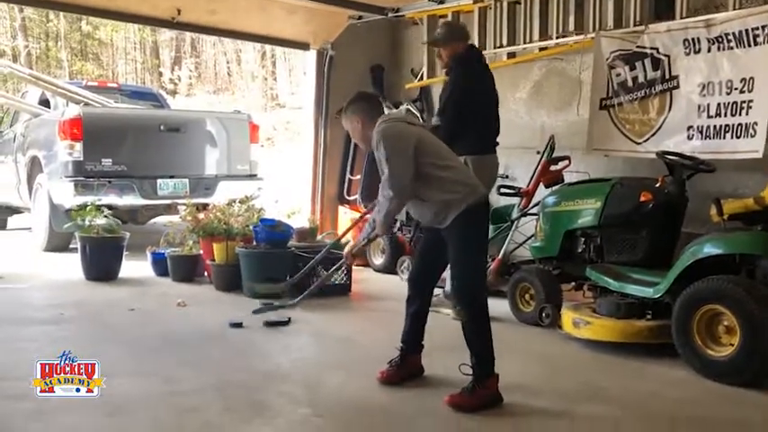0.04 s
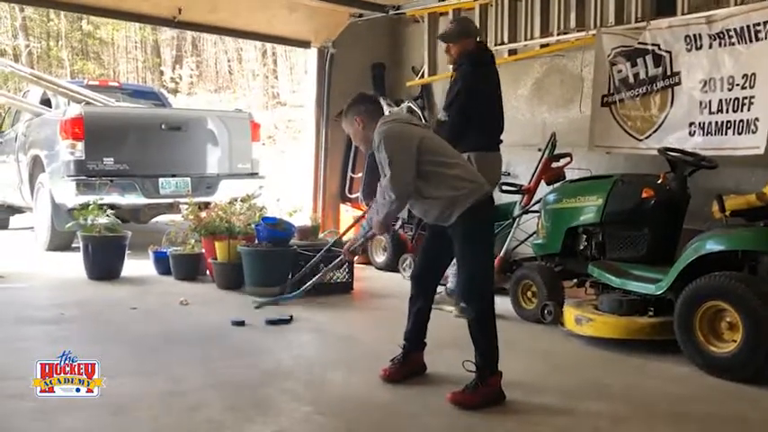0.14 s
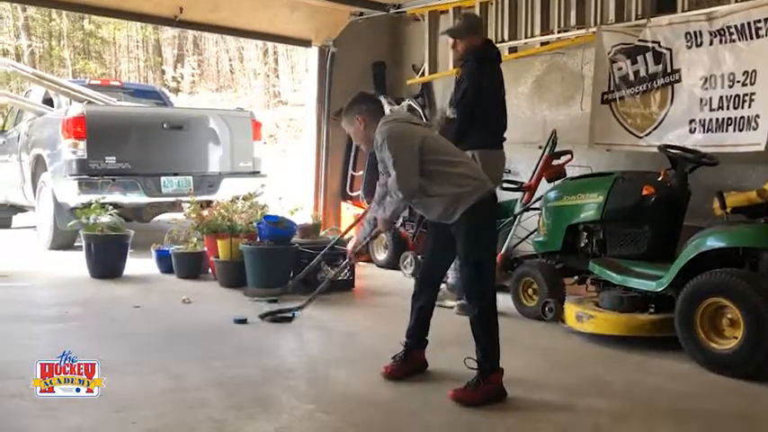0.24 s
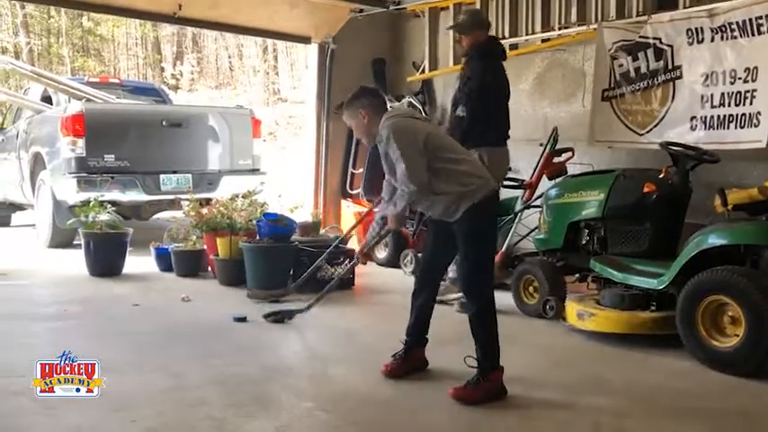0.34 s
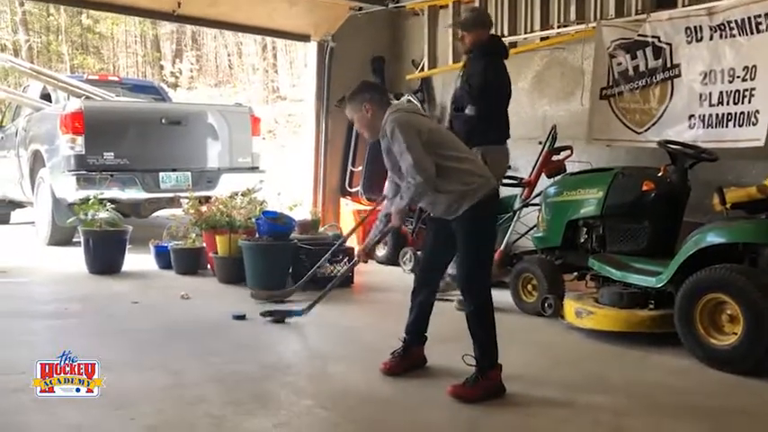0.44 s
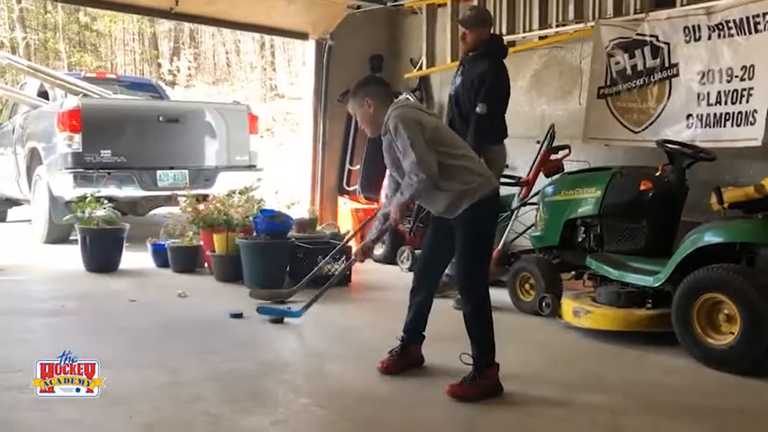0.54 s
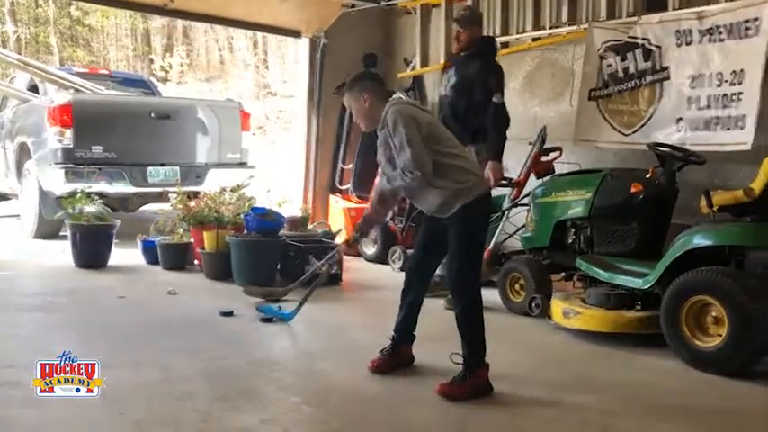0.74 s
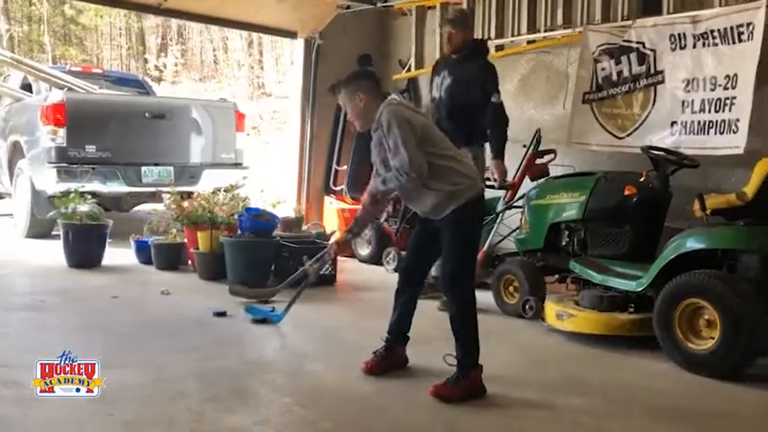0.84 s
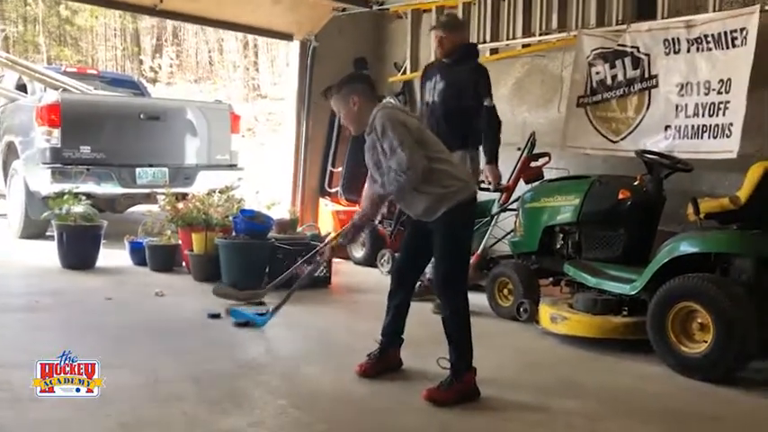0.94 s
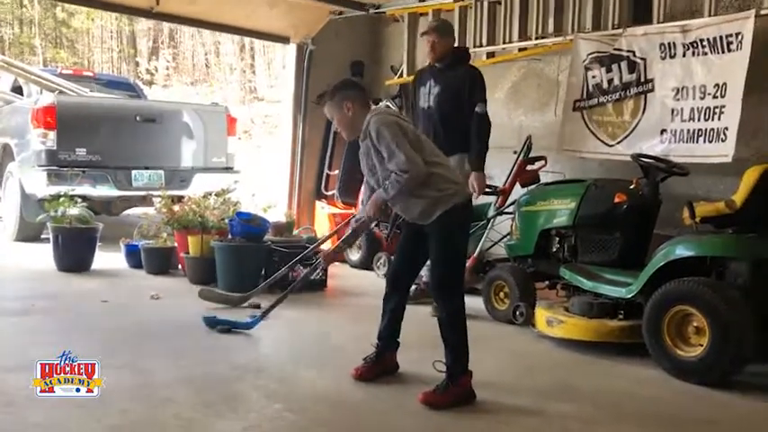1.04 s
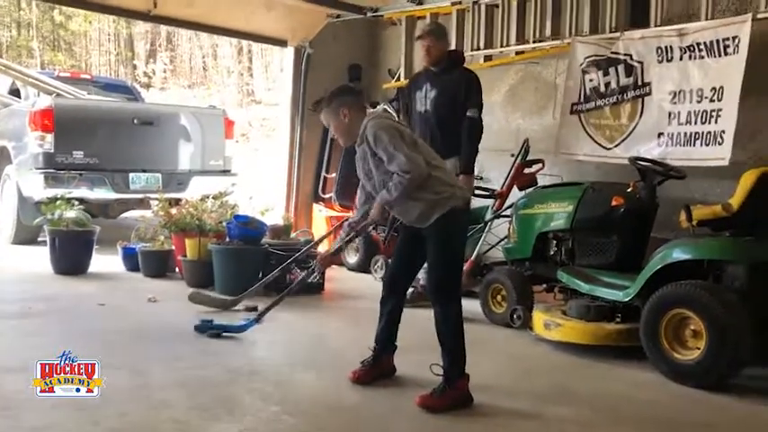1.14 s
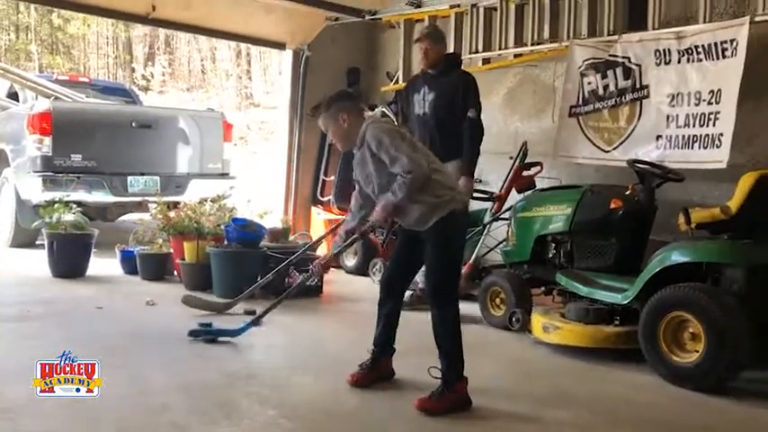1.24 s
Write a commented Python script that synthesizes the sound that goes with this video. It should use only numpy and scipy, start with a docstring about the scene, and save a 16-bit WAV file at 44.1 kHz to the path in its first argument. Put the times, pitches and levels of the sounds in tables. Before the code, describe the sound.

Hockey stick hits on pucks ring briefly off hard garage walls, a few steps from the microphone. First comes a cracking shot and a dull landing, then gritty sliding on concrete, a second sharp clack, and softer taps and scuffs.

```python
"""Garage with a concrete floor, hockey practice. A stick slaps a puck away and it lands with a dull thud;
blades then clack and tap on pucks and scrape over the floor to gather the next one. Each blow is a push,
a noisy crack and ringing modes; scraping is a stream of tiny catches on the concrete's grains.
The hard walls ring after every blow. Faint outdoor noise comes through the open door."""
import sys
import numpy as np
from scipy import signal
from scipy.fft import rfft, irfft, next_fast_len
from scipy.io import wavfile

SR = 44100
rng = np.random.default_rng(int(sys.argv[2]) if len(sys.argv) > 2 else 0)


def waveform_to_disk(signal):
    """Save audio, clipped to [-1, 1], as 16-bit WAV at the path in sys.argv[1]."""
    frames = np.transpose(np.atleast_2d(signal))
    scaled = np.clip(frames, -1, 1) * 32767
    samples = np.round(scaled).astype(np.int16)
    wavfile.write(sys.argv[1], SR, samples)


N = 57330


def amp(db):
    """Decibels to gain."""
    return 10 ** (np.asarray(db) / 20)


def unit(x):
    """Scale to rms 1."""
    return x / np.sqrt(np.mean(x ** 2) + 1e-20)


def burst(x):
    """Scale to the energy of 10 ms at rms 1."""
    return x * np.sqrt(SR / 100 / (np.sum(x ** 2) + 1e-20))


def along(points, hz):
    """Interpolate (frequency [Hz], value) points on a log axis."""
    points_hz, values = np.transpose(points)
    return np.interp(np.log(hz + 1), np.log(points_hz + 1), values)


def colour(x, gain):
    """Minimum-phase filter with magnitude gain(hz)."""
    size = 2 * next_fast_len(len(x))
    magnitude = np.maximum(gain(np.fft.rfftfreq(size, 1 / SR)), 1e-6)
    cepstrum = irfft(np.log(magnitude), size)
    cepstrum[1:size // 2] *= 2
    cepstrum[size // 2 + 1:] = 0
    return irfft(rfft(x, size) * np.exp(rfft(cepstrum)), size)[:len(x)]


def shaped(x, spectrum):
    """Filter by (frequency [Hz], gain [dB]) points."""
    return colour(x, lambda hz: amp(along(spectrum, hz)))


def garage(x):
    """Wall echoes stand out of a tail that swells briefly and dies, treble first."""
    # reverberation (frequency [Hz], t60 [s])
    decay = [(80, 1.6), (180, 0.33), (350, 0.75), (800, 0.76), (2000, 0.6), (4000, 0.49), (7000, 0.38),
             (12000, 0.28), (16000, 0.23)]
    # wall reflections (delay [s], gain [dB])
    echoes = [(.0105, -33), (0.026, -12.5), (.041, -10.5)]
    wall_delay_s, bloom_s = 0.0042, 0.0058
    hz, t, noise = signal.stft(rng.standard_normal(SR), SR, nperseg=256)
    t60_s = along(decay, hz)[:, None]
    tail = signal.istft(noise * amp(-60 * t / t60_s) / np.sqrt(t60_s), SR, nperseg=256)[1]
    age_s = np.maximum(np.arange(len(tail)) / SR - wall_delay_s, 0)
    tail *= 1 - np.exp(-age_s / bloom_s)
    tail /= np.linalg.norm(tail)
    for delay_s, db in echoes:
        tail[round(delay_s * SR)] += amp(db)
    return signal.fftconvolve(x, tail)[:len(x)]


def add(out, start_s, x):
    """Mix x in from start_s."""
    i = round(start_s * SR)
    x = x[max(-i, 0):][:N - max(i, 0)]
    out[max(i, 0):][:len(x)] += x


def blows(hits, modes, crack, room, ring_db, crack_db, push_db, crack_t60_s, low_hz):
    """Each contact gives a push, a noisy crack and ringing modes; little radiates below low_hz."""
    out, t = np.zeros(N), np.arange(SR) / SR
    for start_s, db, cutoff_hz in hits:
        ring = np.zeros(SR)
        for k, (mode_hz, mode_db, t60_s) in enumerate(modes):
            envelope = amp(mode_db + rng.normal(0, 1) - 60 * t / t60_s)
            ring += (-1) ** k * envelope * np.sin(2 * np.pi * mode_hz * t)
        noise = burst(shaped(rng.standard_normal(SR) * amp(-60 * t / crack_t60_s), crack))
        push = burst(shaped(signal.unit_impulse(SR), crack))
        hit = amp(ring_db) * burst(ring) + amp(crack_db) * noise + amp(push_db) * push
        hit = colour(hit, lambda hz: 1 / np.hypot(1, hz / cutoff_hz)
                     / np.hypot(1, (low_hz / (hz + 1)) ** 2))
        hit = amp(db) * burst(hit)
        add(out, start_s, hit + garage(shaped(hit, room)))
    return out


def grit(grains_per_s=2500, spread_db=2.5):
    """Tiny random catches on the grains of the concrete."""
    catches = (rng.random(N) < grains_per_s / SR) * rng.standard_normal(N)
    return catches * amp(spread_db * np.minimum(rng.exponential(size=N), 3))


def clacks():
    """The blade knocks on a puck and rings freely."""
    # knocks (time [s], level [dB], cutoff [Hz])
    hits = [(-.1, -22, 4300), (.6486, -26.5, 7900), (.6496, -15.5, 3030)]
    # free blade (frequency [Hz], level [dB], t60 [s])
    modes = [(694, -14, 0.037), (1352, -4.5, 0.055), (1427, 4, 0.046), (1640, -3, 0.051),
             (2121, -6.5, 0.047), (2650, -7, 0.017), (3400, -24, .018), (4330, -6.5, 0.072),
             (5210, -18, 0.027)]
    # contact spectrum (frequency [Hz], gain [dB])
    crack = [(60, -21), (250, -7.5), (700, -14), (950, -10), (1400, 4.5), (3400, 1), (5200, -7),
             (7000, -16), (16000, -20)]
    # room over direct (frequency [Hz], gain [dB])
    room = [(100, 4), (350, -2.5), (670, 7), (950, 2), (1400, -10), (2200, -1), (3300, -6), (4400, -4.5),
            (12000, -1.5)]
    return blows(hits, modes, crack, room,
                 ring_db=-1.5, crack_db=-2.5, push_db=-3.5, crack_t60_s=0.022, low_hz=446)


def air(level_db=-60.5):
    """Faint outdoor noise through the open door."""
    # background (frequency [Hz], gain [dB])
    spectrum = [(20, -30), (45, -9), (80, -2), (110, -3.5), (250, 5), (600, -4), (2000, -38), (6000, -36),
                (16000, -46)]
    return amp(level_db) * unit(shaped(rng.standard_normal(N), spectrum))


def sliding(trim_db=-1):
    """Blade and puck slide over concrete: a gritty hiss over a low rub."""
    # slide before trim (time [s], hiss [dB], rub [dB])
    levels = [(.2, -64.5, -100), (.34, -46, -73), (.39, -37.5, -52), (.435, -40, -55), (.46, -39.5, -47),
              (.51, -42.5, -44), (.55, -46, -38.5), (.62, -67, -45), (0.661, -81, -47.5), (.79, -60, -70),
              (0.851, -59, -41), (.9, -46.5, -48), (1.0, -56, -54.5), (1.08, -50.5, -74),
              (1.135, -41.5, -59), (1.18, -56, -66), (1.215, -45.5, -56), (1.3, -67, -52.5)]
    # gritty hiss (frequency [Hz], gain [dB])
    hiss_spectrum = [(300, -30.5), (1500, 9), (4000, 3.5), (6500, -2.5), (9000, -8), (13000, -7.5),
                     (16000, -12)]
    # low rub (frequency [Hz], gain [dB])
    rub_spectrum = [(40, -22), (130, -16.5), (260, 4), (420, -4.5), (600, 3), (820, 5.5), (1100, -2),
                    (1800, 0), (3200, -11), (5000, -13.5), (9000, -22)]
    t = np.arange(N) / SR
    time_s, hiss_db, rub_db = np.transpose(levels)
    hiss = amp(np.interp(t, time_s, hiss_db)) * unit(shaped(grit(), hiss_spectrum))
    rub = amp(np.interp(t, time_s, rub_db)) * unit(shaped(grit(), rub_spectrum))
    direct = amp(trim_db) * (hiss + rub)
    return direct + garage(direct)


def shot():
    """The blade slaps floor and puck in quick succession."""
    # contacts (time [s], level [dB], cutoff [Hz])
    hits = [(.231, -17.5, 6170), (.2346, -16.5, 5900), (.2383, -27, 7000)]
    # blade flexed against the floor (frequency [Hz], level [dB], t60 [s])
    modes = [(829, 0.5, 0.028), (1125, -2, 0.016), (1696, -7, 0.04), (1942, -4, 0.028), (2240, -12.5, .025),
             (3000, -2.5, 0.011), (4230, -5.5, 0.049), (4420, 0, 0.011), (5280, -8, .025),
             (5980, -8.5, 0.026)]
    # contact spectrum (frequency [Hz], gain [dB])
    crack = [(60, -37.5), (250, -10), (450, -20), (650, -21), (950, -2.5), (1400, 3.5), (2500, 1.5),
             (4500, -2.5), (7000, -10.5), (11000, -14), (16000, -14.5)]
    # room over direct (frequency [Hz], gain [dB])
    room = [(80, 15.5), (250, 3.5), (400, 4), (600, 13.5), (820, -7), (1300, -1.5), (2200, 0), (4500, 2),
            (9000, 6.5), (15000, 7)]
    return blows(hits, modes, crack, room,
                 ring_db=-0.5, crack_db=4, push_db=-15, crack_t60_s=0.025, low_hz=156)


def ticks():
    """The blade's edge snaps on concrete."""
    # snaps (time [s], level [dB], cutoff [Hz])
    hits = [(.2418, -20.5, 20000), (.8713, -37, 4530)]
    # edge ring (frequency [Hz], level [dB], t60 [s])
    modes = [(1840, -3.5, 0.019), (3830, 3.5, 0.0053), (4160, -1, 0.03), (5520, 0.5, 0.0084)]
    # contact spectrum (frequency [Hz], gain [dB])
    crack = [(100, -42), (1500, -3.5), (2800, -12), (3900, -3), (4800, -2.5), (5600, -1), (7000, -5.5),
             (16000, -12)]
    # room over direct (frequency [Hz], gain [dB])
    room = [(200, 9.5), (3000, -2), (12000, -16)]
    return blows(hits, modes, crack, room,
                 ring_db=-1.5, crack_db=-3, push_db=-14, crack_t60_s=0.0054, low_hz=300)


def thud():
    """The puck lands at the far end."""
    # landing (time [s], level [dB], cutoff [Hz])
    hits = [(.339, -26.5, 1300)]
    # dull ring (frequency [Hz], level [dB], t60 [s])
    modes = [(156, -11, 0.053), (284, -3.5, .05), (451, -3.5, 0.061), (652, -1.5, 0.047), (795, 6.5, 0.052)]
    # contact spectrum (frequency [Hz], gain [dB])
    crack = [(40, -44), (130, -3), (280, 0.5), (450, 4.5), (800, 9.5), (1200, 6), (4000, -2), (16000, -30)]
    # room over direct (frequency [Hz], gain [dB])
    room = [(100, 1.5), (300, -0.5), (700, 2.5), (3000, -8)]
    return blows(hits, modes, crack, room,
                 ring_db=-2.5, crack_db=0.5, push_db=-5, crack_t60_s=0.091, low_hz=101)


def scuffs(q=2, room_db=-4):
    """The blade's edge digs in for a moment: a swell of grit in one band."""
    # blade on grit (time [s], length [s], level [dB], centre [Hz])
    strokes = [(.391, 0.025, -42.5, 12900), (0.441, 0.024, -39.5, 7230), (0.448, 0.041, -46, 14800),
               (.533, 0.022, -45.5, 7740), (0.998, 0.02, -51.5, 7500), (1.114, 0.029, -44.5, 12900),
               (1.155, 0.014, -58, 8000), (1.204, 0.019, -44.5, 4800)]
    out = np.zeros(N)
    for start_s, length_s, db, centre_hz in strokes:
        rasp = colour(grit(), lambda hz: 1 / np.hypot(1, q * (hz / centre_hz - centre_hz / (hz + 1))))
        swell = np.hanning(round(length_s * SR))
        add(out, start_s, amp(db) * swell * unit(rasp)[:len(swell)])
    return out + amp(room_db) * garage(out)


def bumps():
    """Stick heel and shoes bump softly on the floor."""
    # contacts (time [s], level [dB], cutoff [Hz])
    hits = [(.8725, -39, 1100), (.892, -41.5, 705), (1.094, -43.5, 400), (1.17, -48, 200),
            (1.235, -51, 248)]
    # low ring (frequency [Hz], level [dB], t60 [s])
    modes = [(191, -3, 0.073), (267, -4, .07), (443, -4.5, 0.083)]
    # contact spectrum (frequency [Hz], gain [dB])
    crack = [(40, -34), (130, -12), (260, -2.5), (600, 1), (950, -1), (1300, -20), (4000, -24),
             (16000, -34)]
    # room over direct (frequency [Hz], gain [dB])
    room = [(100, -3.5), (300, 1.5), (900, -1), (3000, -6)]
    return blows(hits, modes, crack, room,
                 ring_db=-10.5, crack_db=-4, push_db=-13, crack_t60_s=0.14, low_hz=140)


def taps():
    """Light taps of the blade stop a puck."""
    # contacts (time [s], level [dB], cutoff [Hz])
    hits = [(1.0923, -31.5, 5000), (1.0973, -35.5, 2500)]
    # blade ring (frequency [Hz], level [dB], t60 [s])
    modes = [(1540, -3, .02), (1670, -4, .03), (1820, -2, 0.055), (2960, -24, 0.013), (4130, 3.5, 0.027)]
    # contact spectrum (frequency [Hz], gain [dB])
    crack = [(100, -23), (900, -18.5), (1600, 8.5), (2800, -3.5), (4000, -3), (5500, -10.5), (16000, -18)]
    # room over direct (frequency [Hz], gain [dB])
    room = [(200, 17), (1600, -5.5), (3500, -4.5), (12000, 3)]
    return blows(hits, modes, crack, room,
                 ring_db=0, crack_db=5, push_db=8.5, crack_t60_s=0.012, low_hz=800)


def scene():
    """Mono mix of all sources."""
    impacts = shot() + clacks() + taps() + ticks() + thud() + bumps()
    return (impacts + sliding() + scuffs() + air())[None]


def record(dry):
    """The recorder rounds the highest peaks and keeps nothing above its band limit."""
    ceiling, top_hz = 0.7, 15900
    soft = dry / (1 + (dry / ceiling) ** 4) ** 0.25
    size = next_fast_len(N + SR // 2)
    passband = np.fft.rfftfreq(size, 1 / SR) < top_hz
    return irfft(rfft(soft, size) * passband, size)[:, :N]


dry = scene()
out = record(dry)
waveform_to_disk(out)
```